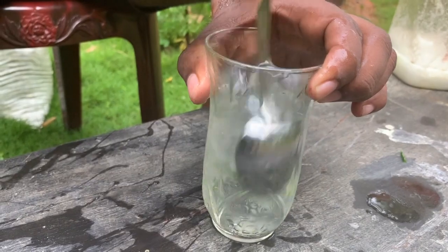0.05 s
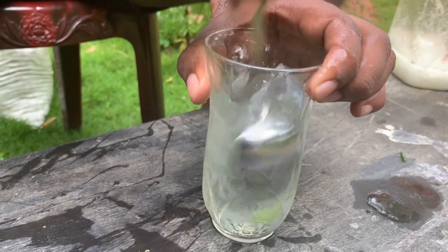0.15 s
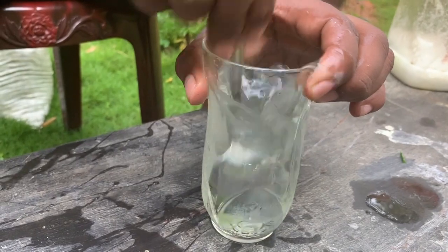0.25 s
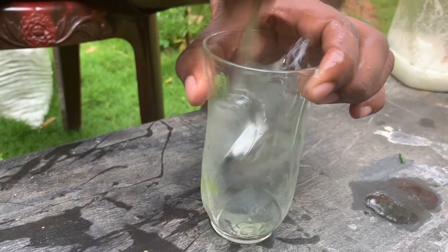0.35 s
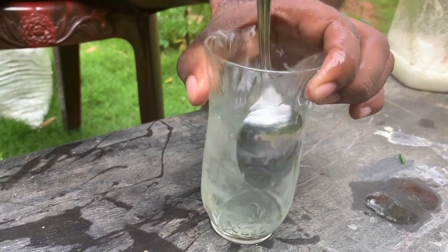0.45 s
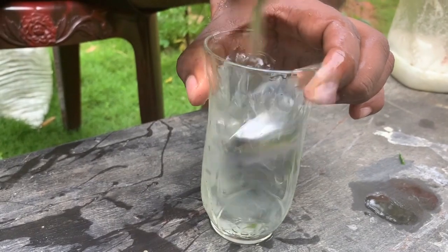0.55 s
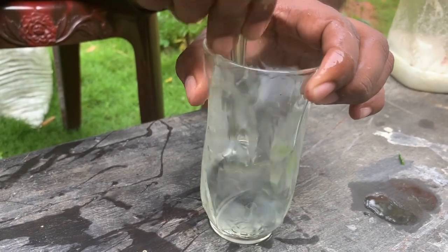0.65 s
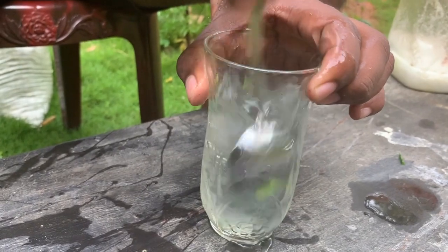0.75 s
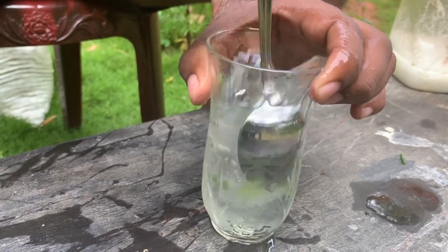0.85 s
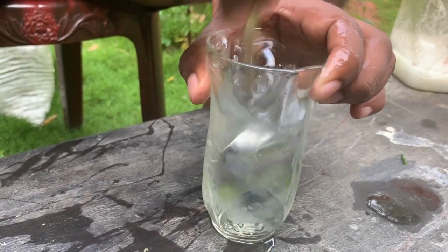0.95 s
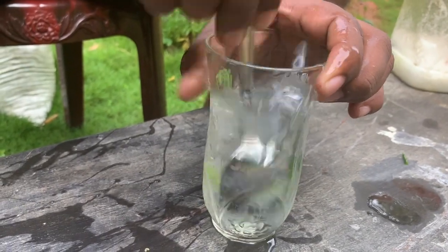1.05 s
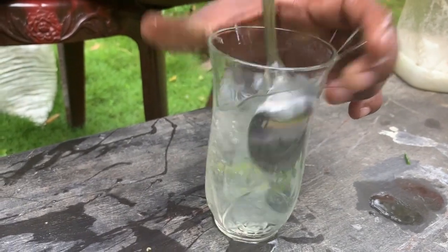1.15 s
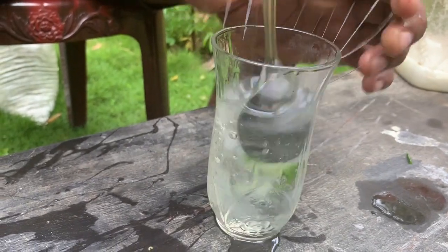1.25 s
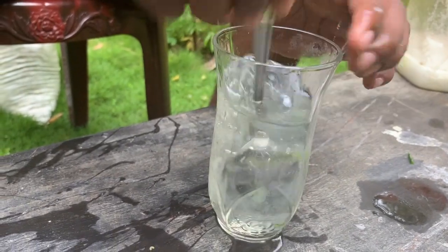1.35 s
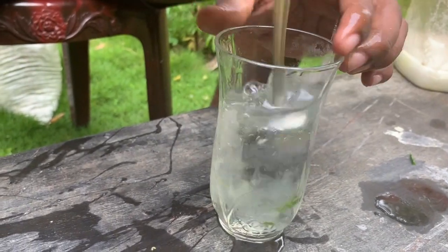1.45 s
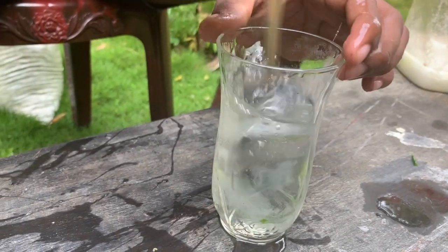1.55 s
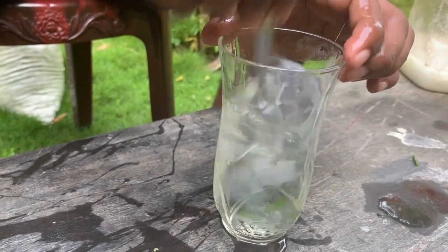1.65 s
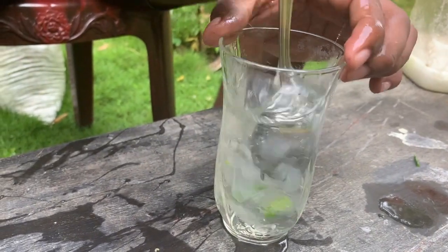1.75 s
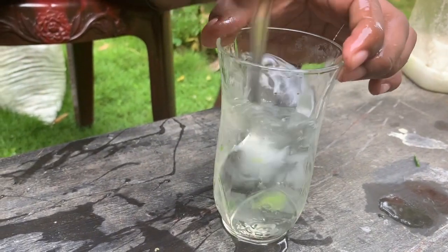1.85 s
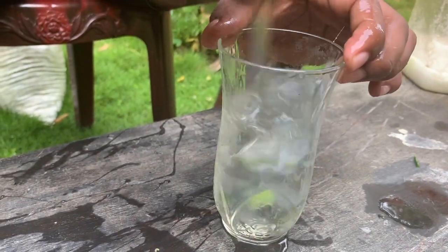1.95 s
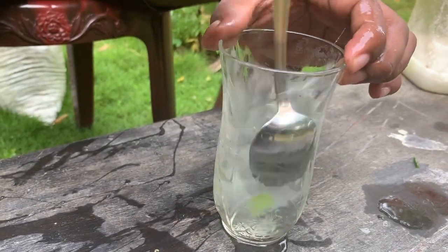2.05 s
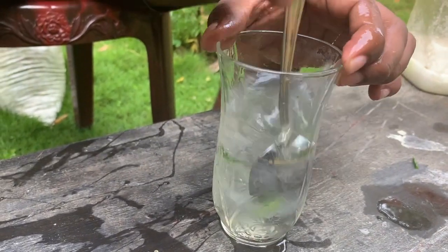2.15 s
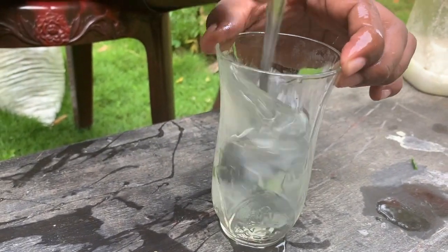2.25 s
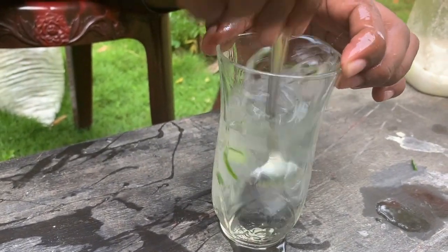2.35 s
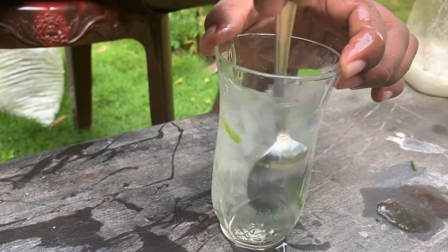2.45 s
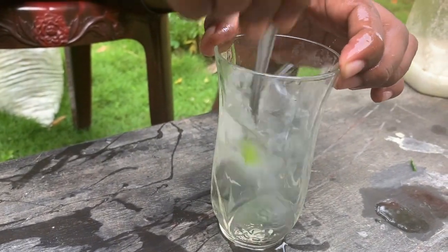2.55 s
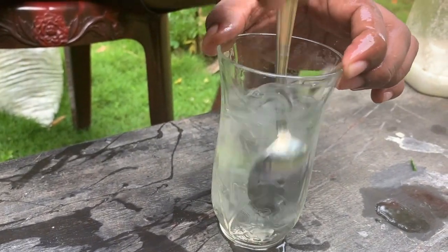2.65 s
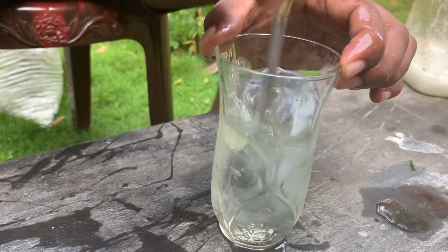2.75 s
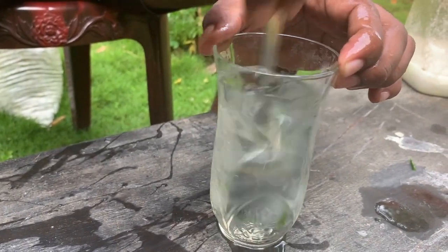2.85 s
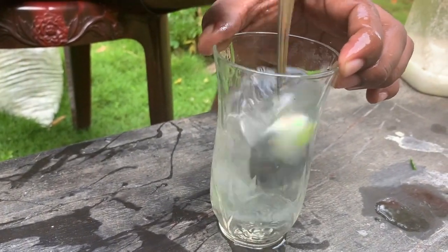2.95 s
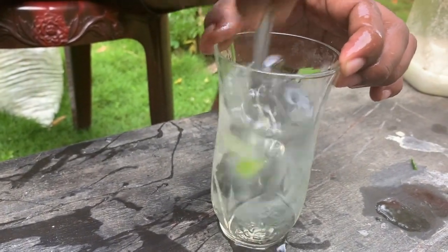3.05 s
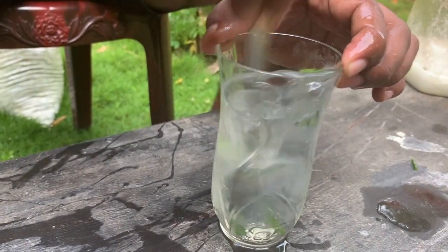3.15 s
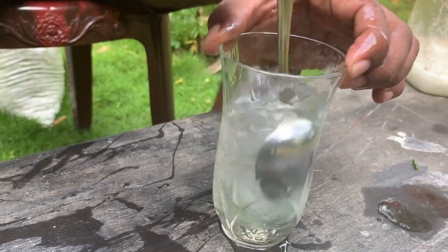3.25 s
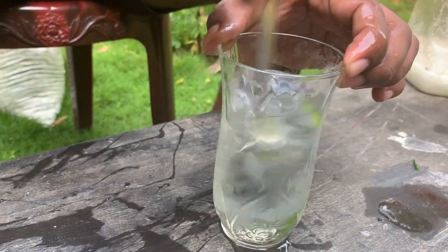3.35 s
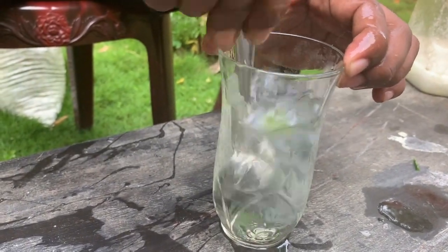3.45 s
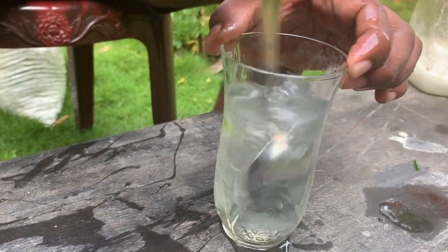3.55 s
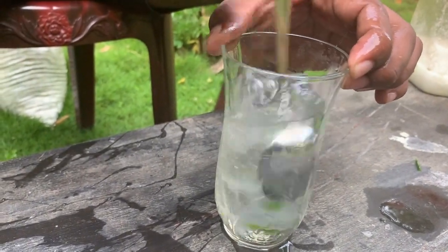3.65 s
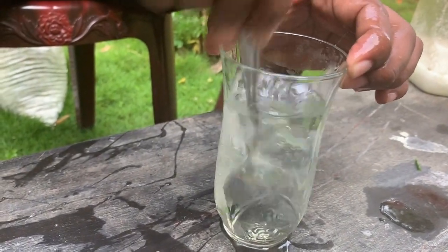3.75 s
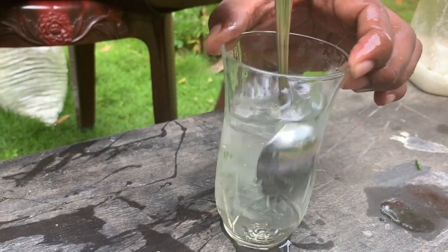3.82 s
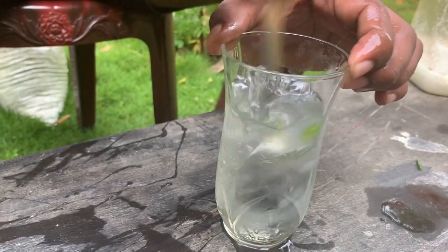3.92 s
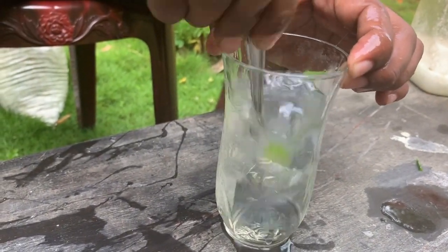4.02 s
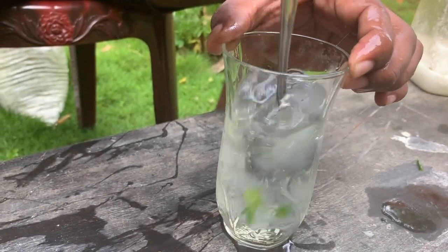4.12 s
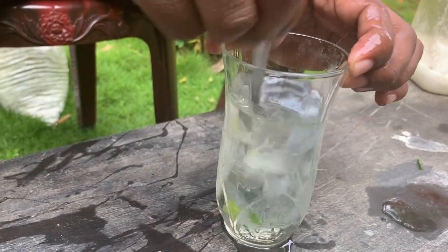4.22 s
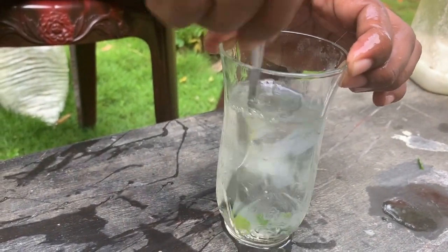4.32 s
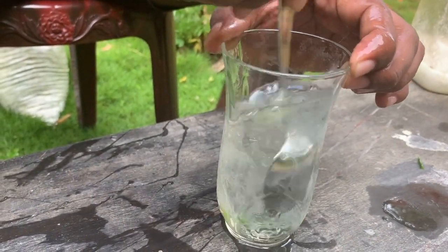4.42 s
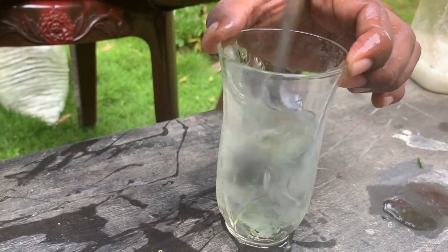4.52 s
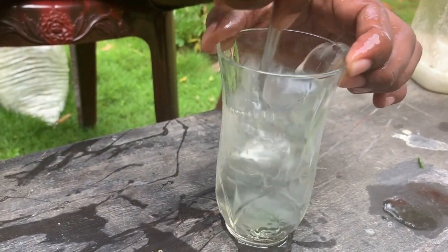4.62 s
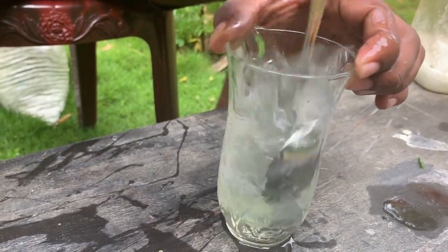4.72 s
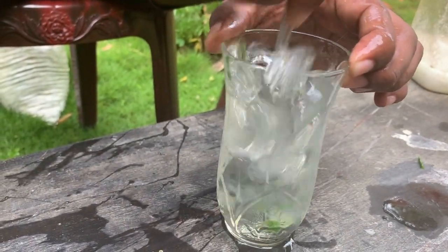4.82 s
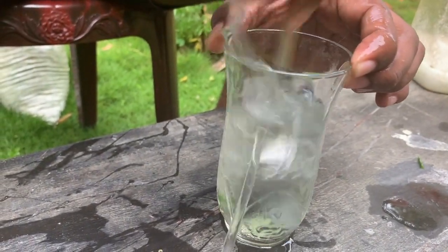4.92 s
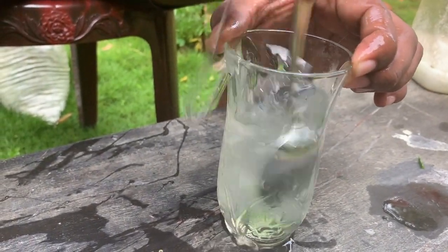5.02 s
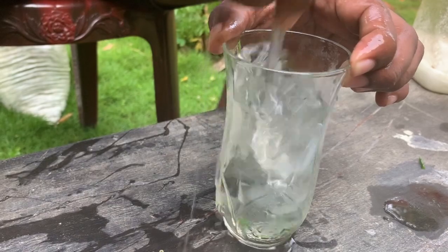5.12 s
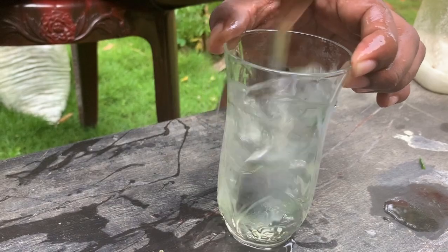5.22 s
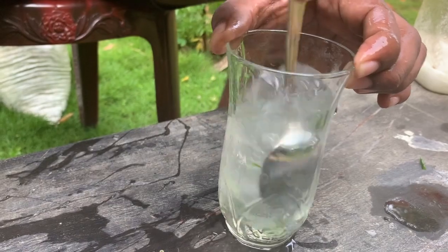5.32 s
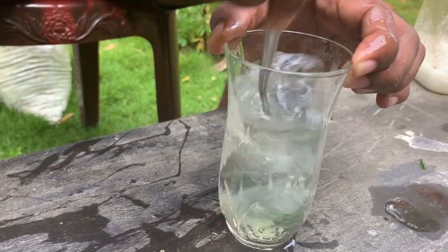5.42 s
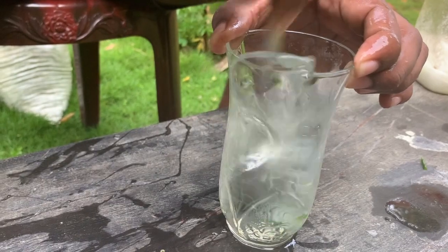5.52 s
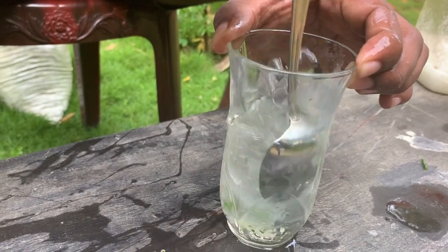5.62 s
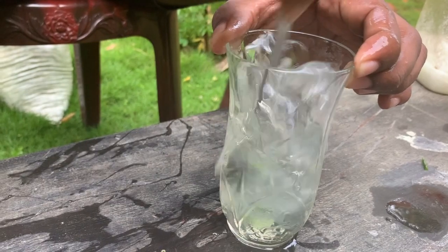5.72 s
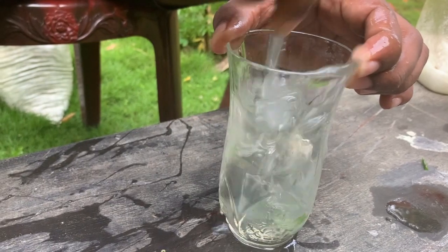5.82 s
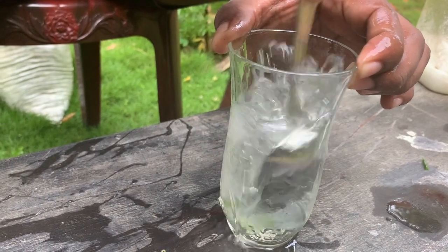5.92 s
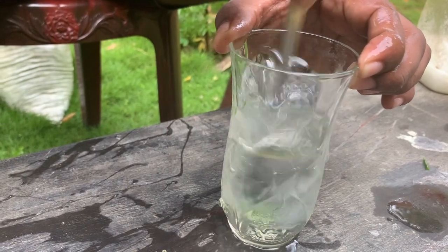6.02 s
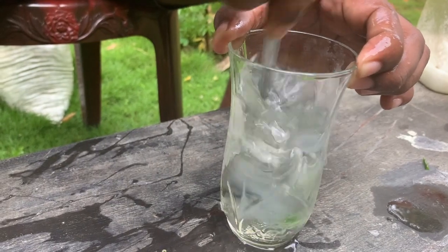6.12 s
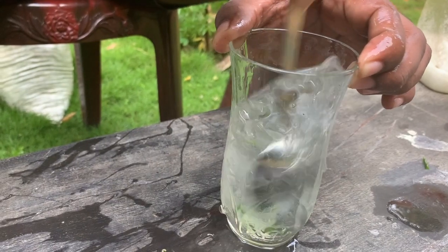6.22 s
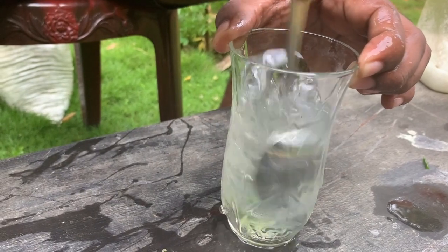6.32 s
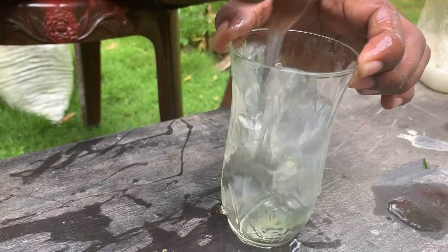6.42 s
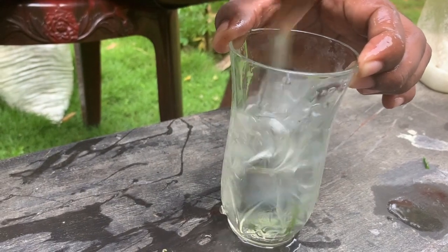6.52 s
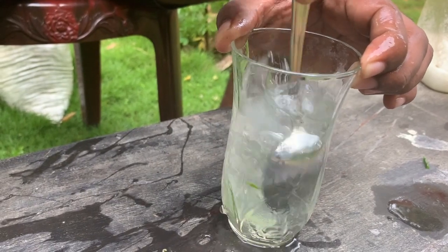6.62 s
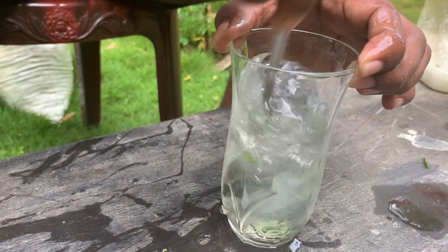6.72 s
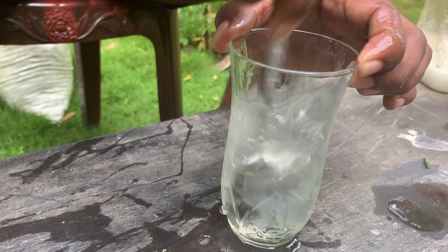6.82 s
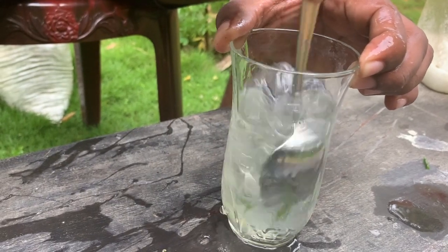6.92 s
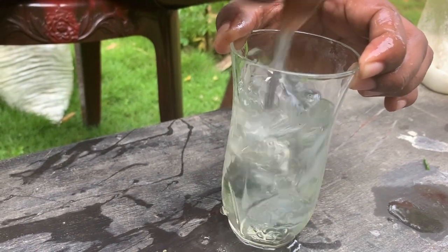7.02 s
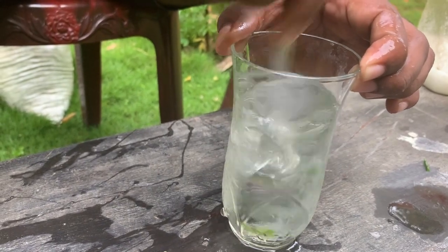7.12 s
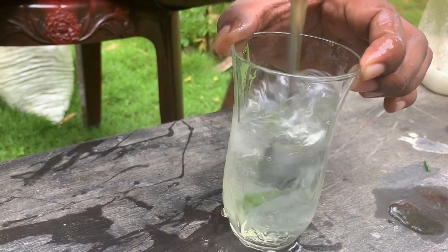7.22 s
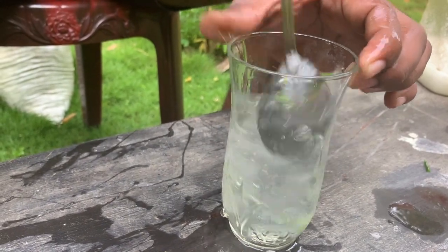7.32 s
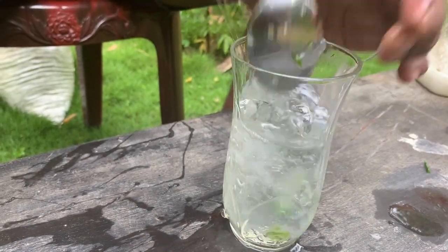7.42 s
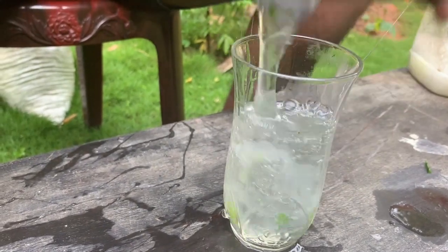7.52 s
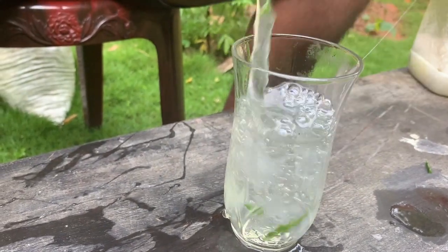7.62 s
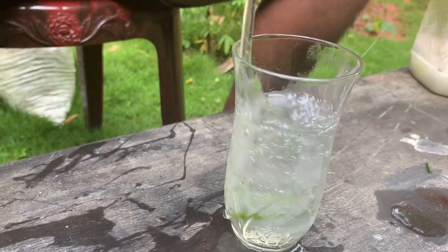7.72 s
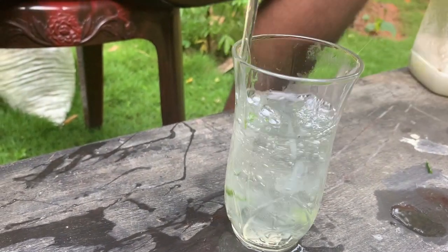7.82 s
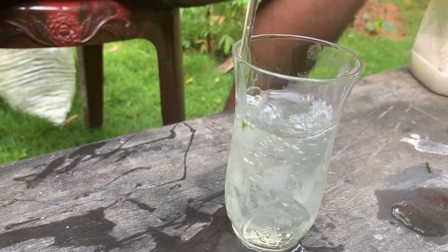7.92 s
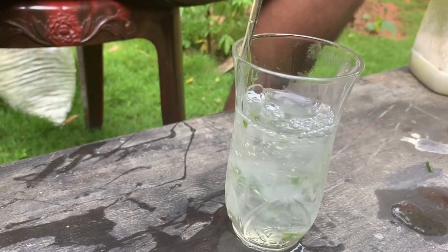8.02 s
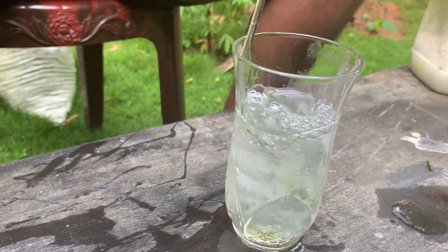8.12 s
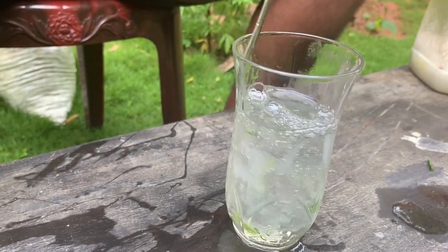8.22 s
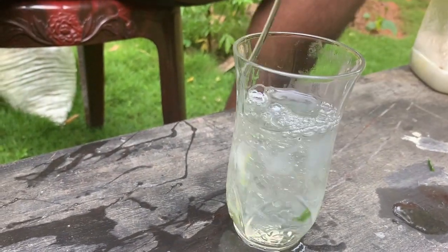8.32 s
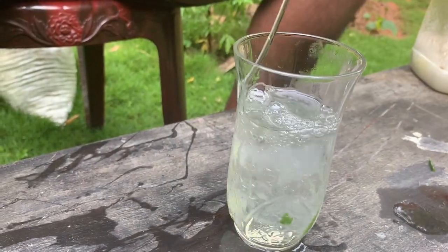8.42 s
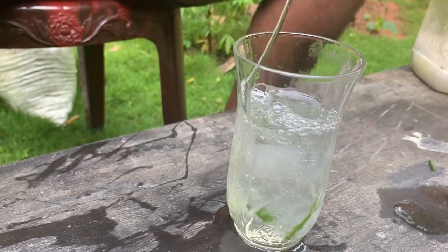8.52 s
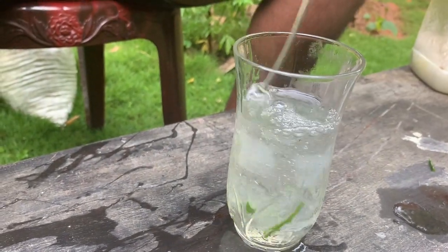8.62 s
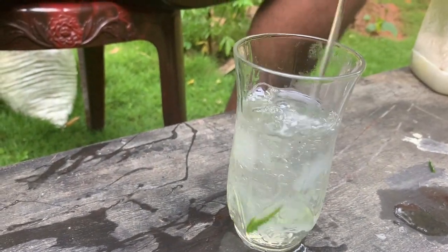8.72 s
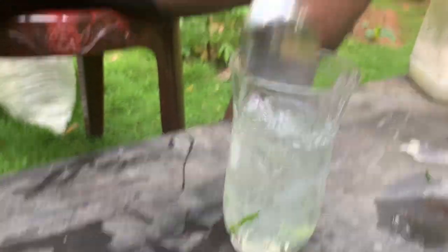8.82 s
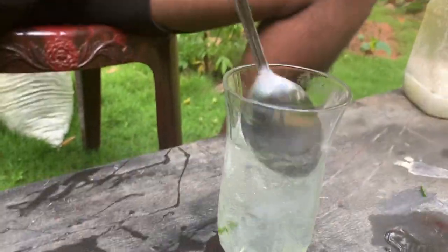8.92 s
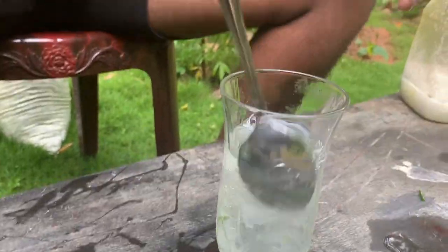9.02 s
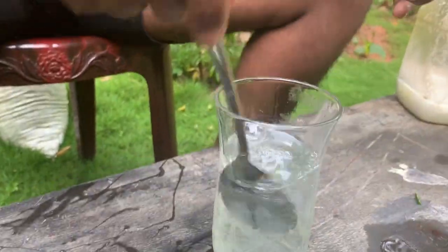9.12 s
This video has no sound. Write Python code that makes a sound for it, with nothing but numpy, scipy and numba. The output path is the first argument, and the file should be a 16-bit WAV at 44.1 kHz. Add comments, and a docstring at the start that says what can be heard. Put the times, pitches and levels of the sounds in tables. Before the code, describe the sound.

Very close, dry stereo pickup in a garden. From 0 s a steel spoon stirs ice and juice in a tall glass on a wooden table: quick, irregular clinks, roughly ten a second, each a tiny rattle of contacts with a bright crack, a short liquid-damped ring near 2 kHz and a dull woody knock. Juice rushes and swishes, with small rising bubbles, ice ticks and a few bigger gurgles early on. Around 1.2 to 1.4 s the stirring briefly lets up, then resumes, growing dense and vigorous from 3 s, with a short easing near 4.4 s. Clinks crowd together between 5 and 7 s. The last firm knocks come just after 7 s; sloshing dies by 7.5 s. Then only low rumble, soft hiss, faint insects and muffled bass thuds, with tiny touches near 7.7 s and one light, clearer clink at 8.9 s.

```python
"""A steel teaspoon whips ice and juice round a tall glass on a wooden table in a garden, close to a phone.
Each knock is a burst of contacts: damped sines ring the glass and, a few ms later, the table top.
Juice is shaped noise that surges with the knocks, plus rising sines for bubbles and light ticks of ice.
Behind it: sagging low sines as thuds, noise as rumble and soft hiss, and narrow noise bands as insects."""
import sys
import numpy as np
from scipy import signal
from scipy.fft import rfft, irfft, next_fast_len
from scipy.io import wavfile
from scipy.ndimage import uniform_filter1d
from numba import njit

SR = 44100
rng = np.random.default_rng(int(sys.argv[2]) if len(sys.argv) > 2 else 0)


def inscribe(sig):
    """Save sig as 16-bit PCM at rate SR to the path in sys.argv[1].

    A 1-D sig is mono; a 2-D sig holds one channel per row.
    Samples are clipped to [-1, 1] before scaling.
    """
    pcm = np.round(np.clip(np.atleast_2d(sig).T, -1, 1) * 32767)
    wavfile.write(sys.argv[1], SR, pcm.astype(np.int16))


N = 403956  # length in samples


def undb(db):
    """Turn dB into a linear gain."""
    return 10 ** (np.asarray(db) / 20)


def on_log(table, hz):
    """Read a (Hz, value) table at the given frequencies, straight lines over log frequency."""
    f, v = np.transpose(table)
    return np.interp(np.log(np.maximum(hz, 1)), np.log(np.maximum(f, 1)), v)


@njit
def add(out, start, pole, glide, rise, left, right):
    """Add decaying, gliding sines that swell over a contact time; complex gains set level and phase per port."""
    for k in range(len(start)):
        z, p, soft = 1. + 0j, pole[k], 1.
        for i in range(start[k], out.shape[1]):
            out[0, i] += (1 - soft) * (z * left[k]).imag
            out[1, i] += (1 - soft) * (z * right[k]).imag
            z, p, soft = z * p, p * glide[k], soft * rise[k]
            if abs(z) < 1e-3:  # 60 dB down
                break


# Stereo timing at the two ports. Each row: frequency in Hz, mean phase by which left leads in radians.
LEAD = [(200, 0.08), (1640, 1), (2070, 6), (2580, 8.5), (3960, 8), (5430, 12.5), (6200, 12.5), (7750, 21),
        (8610, 16), (12100, 6), (12900, 9), (13800, -0.5), (14700, 9), (16400, -6)]


def rings(s, hz, db, t60, rise_s, chance, octaves=0.):
    """Damped modes as the two ports hear them; chance gives (phase, stray of the lead) per ring."""
    s, hz, db, t60, rise_s, octaves = (np.ravel(a) for a in np.broadcast_arrays(s, hz, db, t60, rise_s, octaves))
    hz, t60 = np.clip(hz, 20, .45 * SR), np.maximum(t60, 1 / 500)
    turn = 2 * np.pi * hz / SR  # radians per sample
    pole = np.exp(1j * turn - np.log(1000) / (t60 * SR))
    glide = np.exp(1j * turn * (2 ** octaves - 1) / (t60 * SR))  # the full glide takes one t60
    rise = np.exp(-1 / (np.abs(rise_s) * SR))
    gain = np.exp(2j * chance[0].ravel()) * undb(db)
    lead = on_log(LEAD, hz) + np.minimum(hz / 1500, 1) * chance[1].ravel()
    out = np.zeros((2, N))
    add(out, (s * SR).astype(np.int64), pole, glide, rise, gain * np.exp(.5j * lead), gain * np.exp(-.5j * lead))
    return out


def walk(rate):
    """Random levels held 1 / rate s and slewed twice; spread near 1."""
    k = int(SR / rate)
    steps = np.repeat(rng.standard_normal(N // k + 1), k)
    return 1.3 * uniform_filter1d(uniform_filter1d(steps, k), k)[:N]


def hiss(colour, likeness):
    """Stereo noise of rms 1 with a spectrum and a likeness of left and right per frequency."""
    size = next_fast_len(N)
    hz = np.arange(size // 2 + 1) * SR / size
    alike = np.clip(on_log(likeness, hz), 0, 1)
    white = rfft(rng.standard_normal((2, size)))
    mid, side = white * undb(on_log(colour, hz)) * np.sqrt([1 + alike, 1 - alike])
    x = irfft([mid + side, mid - side], size)[:, :N]
    return x / np.sqrt(np.mean(x ** 2))


# Stirring effort. Each row: time in seconds, slosh in dB before the splash of the knocks is added.
STIR = [(0.0, -31.5), (1.1, -37.5), (1.3, -46.5), (2.43, -43), (3.0, -38), (3.85, -32.5), (4.5, -49.5),
        (4.62, -35.5), (5.8, -33.5), (7.01, -35), (7.402, -47.5)]


def churn_db():
    """How hard the juice moves: the stirring sets the mean, each knock throws it up and it settles again."""
    t, stir_db = np.transpose(STIR)
    s, ring_db = np.transpose(KNOCKS)[[0, 3]]
    push = np.zeros(N)
    push[(s * SR).astype(int)] = undb(0.31 * (ring_db + 5.0))
    settle = np.exp(-1 / (0.032 * SR))
    splash = uniform_filter1d(signal.lfilter([1], [1, -settle], push), SR // 100)
    mean_db = np.interp(np.arange(N) / SR, t, stir_db, right=-120)
    return mean_db + 20 * np.log10(splash + 0.11) + 3.4 * walk(40)


# Colour of the rushing juice. Each row: frequency in Hz, relative level in dB per Hz.
SLOSH = [(100, -17), (245, -3.5), (350, -12.5), (1000, -17.5), (2100, -23.5), (3000, -27), (6200, -28.5),
         (13000, -53)]


def rush(surge_db):
    """Dull rush of moving juice: shaped noise whose level follows the churning."""
    return hiss(SLOSH, [(200, 0.99), (1500, 0.11)]) * undb(surge_db + 0.5)


def bubbles_and_ticks(surge_db, count=4500):
    """Small bubbles rise in pitch, light ticks of ice stay put; both are as strong as the churning."""
    when, pitch, size, kind = rng.random((count, 4)).T
    chance = rng.standard_normal((count, 2)).T
    s = when * STIR[-1][0]
    bubble = kind < .7
    hz = np.where(bubble, 500 * 2 ** (2.5 * np.sqrt(pitch)), 2600 * 2 ** (1.6 * pitch))
    db = surge_db[(s * SR).astype(int)] - 2.5 * np.log(size)  # a few stand out
    db = db + np.where(bubble, .5, -5.)
    t60 = np.where(bubble, 30., 25.) / hz
    return rings(s, hz, db, t60, 0.00051, chance, octaves=0.3 * bubble)


# Colour of the garden air. Each row: frequency in Hz, relative level in dB per Hz.
GARDEN = [(20, -34.5), (40, -21), (62, 7), (100, 5.5), (160, -7.5), (400, -16), (700, -26.5), (1500, -28.5),
          (3900, -27), (5000, -37.5), (8000, -60), (12000, -59), (15000, -86)]
# Stereo width of the garden. Each row: frequency in Hz, likeness of left and right from 0 to 1.
LIKENESS = [(130, .95), (290, 0.8), (700, 0.2), (3100, .15), (6800, 0)]
GARDEN_DB = -49  # mean rms level


def rumble_and_hiss():
    """One bed of noise, heavy in the bass with a soft hiss above, that swells a little."""
    return hiss(GARDEN, LIKENESS) * undb(GARDEN_DB + 1.1 * walk(4))


# Insect bands. Each row: centre in Hz, reach to either side in Hz, mean rms level in dB.
INSECTS = [(2300, 160, -70.5), (6250, 860, -61.5), (9100, 2000, -73.5)]


def insects():
    """Narrow noise bands, flat near the centre and 36 dB down at the edges, each wavering gently in level."""
    chorus = np.zeros((2, N))
    for hz, width, db in INSECTS:
        band = [(hz - width, -36), (hz - 0.31 * width, 0), (hz + 0.18 * width, 0), (hz + width, -36)]
        chorus = chorus + hiss(band, LIKENESS) * undb(db + walk(8.9))
    return chorus


def part(modes, s, rattle_s, db, late_s, rise_s, scatter_db, stray, fade_db, count):
    """One part of glass or table. A knock is a faint first touch, the main contact and a rattle of uneven weaker
    ones; each shares its strength anew among the modes, which the swirling juice detunes."""
    hz, mode_db, t60 = np.moveaxis(np.broadcast_to(modes, (len(s), 1) + np.shape(modes)[-2:]), -1, 0)
    chance = rng.standard_normal((len(s), count, hz.shape[-1], 5)).transpose(3, 0, 1, 2)
    slip, uneven = rng.random((len(s), count, 2)).transpose(2, 0, 1)
    place = (np.arange(count) - 2 + slip) / (count - 2)  # share of the rattle length
    after_s = rattle_s[:, None] * place
    contact_db = -fade_db * place - 9.2 * uneven
    after_s[:, 0], contact_db[:, 0] = -.005 * slip[:, 0], -15.  # first touch
    after_s[:, 1], contact_db[:, 1] = 0, 0  # main contact
    share_db = mode_db + scatter_db * chance[2]
    # the modes of one contact add up to its level
    share_db = share_db - 10 * np.log10(np.sum(undb(2 * share_db), axis=-1, keepdims=True))
    start = np.maximum(s[:, None] + late_s + after_s, 0)
    return rings(start[..., None], hz * (1 + stray * chance[3]), (db[:, None] + contact_db)[..., None] + share_db,
                 t60 * np.exp(0.24 * chance[4]), rise_s, chance)


def main_ring(s, rattle_s, ring_hz, db):
    """The juice sets the pitch; it lasts longer near the glass's own note, most once the froth has cleared."""
    on_note = np.exp(-((ring_hz - 2020) / 90) ** 2)
    t60 = 0.025 + on_note * np.interp(s, [7.5, 8.8], [.025, .075])
    mode = np.stack([ring_hz, 0 * s, t60], -1)[:, None, None]
    return part(mode, s, rattle_s, db, late_s=0.001015, rise_s=0.00055, scatter_db=0., stray=0.0069,
                fade_db=7.4, count=4)


# Modes beside the main ring. Each row: mean pitch in Hz, relative level in dB, typical t60 in seconds.
RING = [(1541, -9.5, 0.018), (1802, -1, 0.018), (2010, -10.5, 0.032), (2243, -12, 0.035)]


def side_rings(s, rattle_s, db):
    """Shorter glass modes around the main ring."""
    return part(RING, s, rattle_s, db, late_s=.001, rise_s=0.0002, scatter_db=3.05, stray=0.023,
                fade_db=1.1, count=4)


# High wall modes. Each row: mean pitch in Hz, relative level in dB, typical t60 in seconds.
HIGH_WALL = [(2933, -10, 0.033), (3234, -1.5, 0.0066), (3880, -5.5, 0.02), (4532, -0.5, 0.0081),
             (4660, -14, 0.021), (5136, -15.5, 0.042), (5846, -3, 0.016), (6394, -5.5, 0.0084),
             (6550, -9.5, 0.027), (6980, -3.5, 0.0041)]


def high_wall(s, rattle_s, db):
    """The crack: high, quickly damped wall modes under a dense rattle."""
    return part(HIGH_WALL, s, rattle_s, db, late_s=0.00082, rise_s=0.0002, scatter_db=6.9, stray=0.042,
                fade_db=15.5, count=7)


# Topmost wall modes. Each row: mean pitch in Hz, relative level in dB, typical t60 in seconds.
TOP_WALL = [(7676, -9.5, 0.018), (8050, -7, 0.016), (9213, -0.5, 0.0096), (10174, 1.5, 0.0084),
            (10626, 3, 0.0068), (10520, -8.5, 0.014), (12770, -4.5, 0.009), (13900, -11.5, 0.02),
            (13400, -10, 0.013), (15250, -21.5, 0.0091), (16400, -30, .01)]


def top_wall(s, rattle_s, db):
    """The glassy edge: the highest wall modes, set off by the shortest contact."""
    return part(TOP_WALL, s, rattle_s, db, late_s=0.0011, rise_s=0.00015, scatter_db=3., stray=0.034,
                fade_db=23.0, count=6)


# Low wall modes. Each row: mean pitch in Hz, relative level in dB, typical t60 in seconds.
LOW_WALL = [(446, 0, 0.071), (480, 0.5, 0.03), (618, -2.5, 0.054), (855, -1, 0.042), (964, -6.5, 0.047),
            (1215, -1, 0.058)]


def low_wall(s, rattle_s, db):
    """The clunk: low modes of the damped wall."""
    return part(LOW_WALL, s, rattle_s, db, late_s=.0015, rise_s=0.00064, scatter_db=2.0, stray=0.03,
                fade_db=33.0, count=4)


# Table modes. Each row: mean pitch in Hz, relative level in dB, typical t60 in seconds.
TABLE = [(47.7, -20.5, 0.33), (96, -13, 0.11), (181, -1, 0.047), (217.2, 3, 0.044), (252.1, -0.5, 0.12)]


def table_top(s, rattle_s, db):
    """The wooden table: low modes that the blow reaches through the foot a few ms late, with a soft onset."""
    return part(TABLE, s, rattle_s, db, late_s=.003, rise_s=0.0022, scatter_db=1.4, stray=0.011,
                fade_db=25.0, count=3)


CLATTER_DB, CLATTER_SPREAD_DB = -18.5, 5  # mean level against the knock, and its spread
CLATTER_S, CLATTER_SHARE = 0.054, .6  # range of delays, and share of knocks that are followed


def clatter():
    """Some knocks send ice against the wall a little later; rows like those of the knocks."""
    s, crack_db, _, ring_db, table_db, top_db = np.transpose(KNOCKS)
    late, pitch, pick = rng.random((len(s), 3)).T
    change_db = CLATTER_DB + CLATTER_SPREAD_DB * rng.standard_normal((len(s), 4)).T
    crack_db, ring_db, table_db, top_db = np.array([crack_db, ring_db, table_db, top_db]) + change_db
    start_s = s + .01 + CLATTER_S * late
    rows = np.transpose([start_s, crack_db, 1500 + 900 * pitch, ring_db, table_db, top_db])
    return rows[pick < CLATTER_SHARE]


# Spoon knocks. Each row: start in seconds, crack on the high wall in dB, main ring in Hz, main ring in dB,
# table in dB, top wall in dB; all levels are before the trim of each part.
KNOCKS = [(0.0084, -7, 1840, -22, -33.5, -22), (0.0871, -11, 1750, -11, -16.5, -20),
          (0.159, -12, 1500, -23, -31, -28), (0.291, -4.5, 2300, -21, -18, -16),
          (0.3417, -16.5, 2050, -24.5, -25.5, -24.5), (0.364, -22, 2220, -24, -27, -33),
          (0.377, -13.5, 1470, -21, -24.5, -31), (0.4098, -45, 1730, -35, -41, -38),
          (0.4394, -9.5, 2520, -23, -25, -27.5), (0.4861, -10, 2230, -18, -19.5, -26),
          (0.5608, -4.5, 2010, -17, -22.5, -12.5), (0.619, -16, 2010, -20, -23, -23.5),
          (0.6422, -28, 1420, -32, -43, -45), (0.6721, -30, 2040, -28, -35, -39),
          (0.7032, -4.5, 1467, -13, -26, -16), (0.7478, -22, 2050, -32.5, -41.5, -27.5),
          (0.7797, -38, 2380, -27.5, -44, -50), (0.826, -4.5, 1980, -22, -19.5, -18),
          (0.8853, -17.5, 2020, -25, -21.5, -33), (0.9398, -23.5, 1520, -27.5, -31, -29),
          (0.97, -6.5, 2230, -11, -24.5, -15), (1.0234, -21, 1840, -22.5, -25.5, -39.5),
          (1.129, -20.5, 2000, -24, -35, -31), (1.1664, -57, 1990, -71, -31.5, -68),
          (1.4174, -15, 1985, -19, -26.5, -33), (1.505, -12, 2140, -25.5, -67, -33),
          (1.5656, -6.5, 2000, -17, -21, -25), (1.5826, -22, 2054, -19.5, -27, -42),
          (1.666, -39, 1660, -33, -44, -49), (1.7368, -10, 2053, -16, -22, -26),
          (1.8183, -14.5, 1750, -24.5, -20, -27), (1.8878, -7.5, 1997, -12.5, -15.5, -20.5),
          (1.961, -5.5, 2020, -14.5, -23.5, -26), (2.0014, -31, 1940, -25, -34, -43),
          (2.0367, -2, 1950, -24, -17.5, -16.5), (2.144, -27, 1720, -36, -47, -40),
          (2.2942, -14, 2040, -23, -42, -31), (2.3488, -3.5, 1480, -16.5, -10, -18),
          (2.4169, -49.5, 1390, -30, -25.5, -50), (2.4528, -17, 2010, -35, -32.5, -30),
          (2.4639, -14, 1713, -20, -33.5, -30), (2.5134, -20, 1950, -24, -24, -32),
          (2.5368, -20, 1950, -29.5, -33.5, -39), (2.6162, -17, 1800, -24.5, -38, -36),
          (2.7275, -23, 2230, -46, -35, -20), (2.7817, -15.5, 1990, -26.5, -27, -33),
          (2.8534, -16, 1980, -28.5, -26.5, -30), (2.8631, -12, 2280, -20.5, -26.5, -31),
          (2.9496, -15.5, 1964, -23.5, -25, -30), (3.0016, -9.5, 1990, -16.5, -16, -24),
          (3.0124, -13.5, 1980, -27, -17.5, -24), (3.023, -5.5, 1970, -16, -24.5, -24),
          (3.0912, -7, 1960, -9.5, -24, -20.5), (3.1452, -25, 1520, -38.5, -40, -41),
          (3.1559, -24, 2200, -23, -29, -34.5), (3.1807, -14.5, 2320, -33, -31, -30),
          (3.2343, -6, 1963, -16, -16, -20.5), (3.2953, -18, 1300, -22, -18.5, -26),
          (3.3029, -10.5, 1954, -17.5, -16.5, -22), (3.3762, -9.5, 1480, -18, -26, -23.5),
          (3.4356, -8.5, 1660, -20, -15, -23), (3.452, -15, 1980, -27, -26, -38),
          (3.5124, -12, 1680, -20, -23.5, -23.5), (3.6466, -7.5, 1880, -11, -16.5, -22.5),
          (3.6953, -24, 1620, -33, -30, -29.5), (3.7197, -6.5, 1630, -11.5, -12, -18.5),
          (3.7569, -15, 2020, -22.5, -35, -28), (3.7914, -10.5, 1946, -14, -19, -23),
          (3.8483, -15.5, 2050, -28.5, -32.5, -30), (3.8703, -9.5, 1640, -12.5, -15, -24),
          (3.932, -6.5, 1980, -17, -18.5, -22), (4.0042, -5, 1670, -11.5, -11, -16),
          (4.0729, -10, 2040, -23, -29.5, -27), (4.0972, -24, 2060, -28, -41, -38),
          (4.151, -25, 1980, -36.5, -45.5, -51), (4.1664, -14.5, 2010, -30.5, -36, -35),
          (4.1864, -15.5, 1970, -24, -26.5, -33), (4.3156, -14, 2025, -20.5, -34, -32),
          (4.3378, -21, 1940, -30.5, -44.5, -40), (4.5405, -15.5, 1950, -22.5, -30, -31.5),
          (4.572, -25.5, 1320, -32, -35.5, -35), (4.5948, -23.5, 1710, -27, -30.5, -44),
          (4.6192, -10, 1376, -14, -24.5, -23), (4.6724, -14.5, 1620, -39, -18.5, -23),
          (4.7067, -4, 1690, -17, -27.5, -15), (4.7384, -25.5, 2020, -34, -30.5, -43),
          (4.789, -10, 1560, -14.5, -26, -21.5), (4.8447, -11.5, 1850, -26.5, -36, -19),
          (4.8646, -5, 1826, -9.5, -25.5, -14), (4.8973, -29, 1490, -34, -34.5, -39.5),
          (4.9432, -12, 2340, -24, -25, -30), (5.022, -16.5, 2120, -34.5, -29.5, -23.5),
          (5.0303, -8, 1975, -13.5, -25.5, -18), (5.0867, -18.5, 2130, -23, -27.5, -33),
          (5.1037, -12, 2320, -20.5, -23, -26), (5.1536, -52, 1640, -54, -32, -51),
          (5.2021, -16, 1900, -20, -22, -31), (5.236, -14.5, 2110, -23, -23.5, -24),
          (5.247, -11.5, 1960, -19, -22, -28), (5.3269, -8, 1980, -16.5, -29, -21),
          (5.3751, -18.5, 2290, -23, -31.5, -33), (5.3866, -5.5, 1600, -16.5, -31, -21),
          (5.395, -7, 2030, -19.5, -21.5, -23), (5.471, -18.5, 1950, -16, -28.5, -31.5),
          (5.5227, -21, 2240, -21, -29.5, -46), (5.5325, -11, 2270, -22, -25.5, -19.5),
          (5.5406, -5, 2380, -19, -18.5, -26), (5.6213, -16, 2000, -16, -29.5, -27.5),
          (5.669, -12, 2040, -18.5, -26, -23), (5.6825, -4.5, 2080, -15.5, -18, -20.5),
          (5.7046, -14, 1530, -20.5, -33, -34), (5.7352, -28, 1630, -29.5, -26.5, -38),
          (5.7593, -17.5, 1690, -9.5, -30.5, -29), (5.769, -8.5, 1955, -17, -28, -23),
          (5.8031, -20, 2140, -17, -27, -39), (5.8106, -16, 2120, -12.5, -28.5, -28.5),
          (5.8292, -10, 2110, -16.5, -21, -21.5), (5.914, -13, 1690, -22.5, -42.5, -30),
          (5.9527, -23, 2110, -22.5, -31.5, -42), (5.9633, -13, 2066, -23.5, -29, -36),
          (5.9761, -15, 1965, -20, -25.5, -26), (6.0074, -47, 1500, -31.5, -17, -51),
          (6.0456, -21, 1910, -25, -29.5, -34), (6.0715, -29, 2150, -28.5, -31.5, -44),
          (6.093, -19, 2030, -21.5, -30, -40), (6.105, -9.5, 2010, -19, -24.5, -27),
          (6.1152, -13, 1730, -13.5, -21, -23), (6.1901, -23, 1610, -15, -27, -30),
          (6.1955, -15, 1910, -13.5, -31.5, -33), (6.2452, -22, 2060, -21.5, -43.5, -42),
          (6.2588, -17, 1940, -44, -36, -47), (6.2716, -16, 1480, -20, -38, -37),
          (6.2978, -7.5, 1590, -19.5, -28, -19), (6.3346, -12.5, 1275, -13.5, -26, -27),
          (6.3824, -18.5, 1305, -16, -27.5, -32), (6.4016, -12, 1610, -13.5, -19.5, -27),
          (6.4272, -18, 2210, -15, -19.5, -30), (6.4974, -19.5, 1890, -28, -32, -34),
          (6.5282, -30, 2030, -18, -33, -41), (6.539, -13.5, 2030, -13, -23.5, -28),
          (6.5505, -13, 1957, -19, -21.5, -24), (6.583, -28, 1700, -60, -32.5, -23),
          (6.6409, -21.5, 2260, -21, -27.5, -33), (6.6843, -28, 2330, -27, -31, -36),
          (6.6953, -18.5, 2240, -23.5, -27, -24), (6.765, -11, 1740, -24, -25.5, -28),
          (6.795, -24.5, 2190, -28, -28.5, -38), (6.8157, -25, 2260, -24, -29.5, -46),
          (6.8309, -32, 2340, -25, -35, -38), (6.8413, -14.5, 2080, -23.5, -27.5, -27),
          (6.9064, -15, 2240, -17.5, -25, -29), (6.9229, -5.5, 2120, -19.5, -25, -25),
          (6.9699, -24, 2210, -24, -27, -38), (6.99, -17.5, 2370, -26, -26, -31),
          (7.0687, -6, 2066, -14.5, -26.5, -22.5), (7.0803, -11, 2150, -14.5, -27.5, -38),
          (7.1072, -24.5, 1650, -22.5, -25, -29), (7.1264, -13.5, 1650, -9, -10.5, -23.5),
          (7.1417, -10, 2270, -18.5, -23.5, -24), (7.1939, -54, 1560, -30.5, -25.5, -70),
          (7.2391, -31.5, 1910, -26.5, -37.5, -44), (7.3816, -26.5, 2260, -25.5, -46.5, -22.5),
          (7.4822, -52, 1960, -41.5, -63, -69), (7.7014, -58.5, 2010, -51.5, -59, -73),
          (7.7985, -54.5, 2390, -49, -69, -70), (8.862, -22.5, 2030, -36.5, -31.5, -26),
          (8.9302, -45, 2070, -53, -34.5, -56)]
RATTLE_S, RATTLE_SPREAD = .0075, 0.38  # median rattle length at -38 dB of stirring; spread in natural log
RATTLE_PER_DB = -0.0138  # change of length with the stirring, natural log per dB
LOW_DB, LOW_SHARE = -0.5, 0.87  # the low wall follows the table by this share, the main ring by the rest
STRAY_DB = 3  # where a blow lands shifts the low wall


def knocks():
    """Spoon and ice on the glass: each blow excites every part of the wall and the table below."""
    rows = np.vstack([KNOCKS, clatter()])
    s, crack_db, ring_hz, ring_db, table_db, top_db = rows.T
    chance = rng.standard_normal((len(s), 2)).T
    stir_db = np.interp(s, *np.transpose(STIR))
    rattle_s = RATTLE_S * np.exp(RATTLE_SPREAD * chance[0] + RATTLE_PER_DB * (stir_db + 38))
    low_db = LOW_DB + LOW_SHARE * table_db + (1 - LOW_SHARE) * ring_db + STRAY_DB * chance[1]
    glass = main_ring(s, rattle_s, ring_hz, ring_db + 5.0)
    glass = glass + side_rings(s, rattle_s, ring_db + 5.0)
    glass = glass + high_wall(s, rattle_s, crack_db + 2.5)
    glass = glass + top_wall(s, rattle_s, top_db + 10.0)
    glass = glass + low_wall(s, rattle_s, low_db + 2.5)
    return glass + table_top(s, rattle_s, table_db + 8.5)


# Big rising bubbles. Each row: start in seconds, level in dB, start pitch in Hz, rise in octaves, t60 in seconds.
GURGLES = [(0.046, -28, 1300, 1.6, 0.066), (.196, -34, 860, 0.59, 0.077), (0.311, -11.5, 458, 0.46, 0.051),
           (.345, -19, 910, 0.98, 0.054), (0.439, -7, 564, 0.73, 0.066), (0.466, -29, 785, 2.1, 0.15),
           (.752, -32, 1010, 1.3, 0.041), (.99, -24, 463, 1.3, 0.091), (1.096, -14, 1500, 1.07, 0.0293),
           (1.135, -14, 1920, 0.5, 0.038), (3.237, -5, 636, 0.3, 0.059), (5.15, -42, 1260, 1.4, 0.029),
           (6.014, -17, 904, 1.4, 0.072), (6.167, -16, 1130, 1, 0.058)]


def gurgles():
    """A few big bubbles: softly starting sines that climb in pitch as they die away."""
    s, db, hz, octaves, t60 = np.transpose(GURGLES)
    return rings(s, hz, db, t60, 0.0054, rng.standard_normal((len(s), 2)).T, octaves=octaves)


# Low thuds. Each row: start in seconds, level in dB before trim, start pitch in Hz.
THUDS = [(0.079, -23, 97.4), (0.331, -49.5, 121), (0.557, -53, 91), (0.822, -23.5, 121.6),
         (1.023, -35, 106), (1.559, -29, 120), (1.807, -33.5, 91), (2.031, -23, 127.4), (2.34, -24, 115.2),
         (2.716, -39.5, 74.5), (2.853, -32.5, 122.7), (3.016, -23.5, 122), (3.296, -21, 118.7),
         (3.439, -24, 117.6), (3.712, -29, 118), (3.865, -29, 86.3), (3.997, -21.5, 107.4),
         (4.224, -26.5, 108.3), (4.452, -34, 78.1), (4.854, -24, 101), (5.097, -25.5, 99.3),
         (5.245, -25, 85.7), (5.394, -20.5, 97.5), (5.541, -26, 101.3), (5.678, -22, 92),
         (5.823, -24, 97.8), (5.975, -32.5, 120.3), (6.112, -23, 113.3), (6.297, -33, 118.8),
         (6.394, -31.5, 101.8), (6.546, -38.5, 110.7), (6.689, -33.5, 110), (7.12, -22, 113),
         (7.438, -34, 80), (7.737, -33.5, 80.5), (8.042, -32, 73), (8.192, -33, 91), (8.347, -35, 102),
         (8.705, -56, 101)]


def thuds():
    """Dull, slow bumps in the bass that sag in pitch, each with a deeper partner."""
    s, db, hz = np.transpose(THUDS)[..., None]
    chance = rng.standard_normal((len(s), 2, 2)).transpose(2, 0, 1)
    return rings(s, hz * [1, .55], db + [1., -4.], [.16, .2], 0.0079, chance, octaves=-0.043)


def scatter(near):
    """Table and furniture answer with a short tail of decaying noise, thin in the bass."""
    t = np.arange(SR // 8) / SR
    decay = np.exp(-np.log(1000) * t / 0.094)  # t60 of 94 ms
    tail = rng.standard_normal((2, len(t))) * decay * (t > .004)
    bright = signal.sosfilt(signal.butter(1, 700, "high", fs=SR, output="sos"), near)
    return undb(-41.5) * signal.fftconvolve(bright, tail, axes=1)[:, :N]


def scene():
    """Glass and juice up close with their scatter, over thuds and garden."""
    surge_db = churn_db()
    juice = rush(surge_db) + bubbles_and_ticks(surge_db) + gurgles()
    near = knocks() + juice
    garden = rumble_and_hiss() + insects()
    return near + scatter(near) + thuds() + garden


# Stereo colour of the ports. Each row: frequency in Hz, left minus right in dB before it is halved.
LEAN = [(60, -2.5), (110, 1), (200, -2), (380, 6), (700, 4), (1290, 6), (2380, 4), (4400, -4), (8120, -6),
        (15000, 2)]


def record(dry):
    """The ports colour left against right; the phone drops the deepest bass, rounds the loudest peaks, cuts the top."""
    size = next_fast_len(N)
    lean_db = .5 * on_log(LEAN, np.arange(size // 2 + 1) * SR / size)
    x = irfft(rfft(dry, size) * undb([lean_db / 2, -lean_db / 2]), size)[:, :N]
    x = signal.sosfilt(signal.butter(2, 30, "high", fs=SR, output="sos"), x)
    rounded = np.tanh(0.79 * x) / 0.78
    return signal.sosfilt(signal.ellip(10, .2, 90, 16800, fs=SR, output="sos"), rounded)


dry = scene()
out = record(dry)
inscribe(out)
```